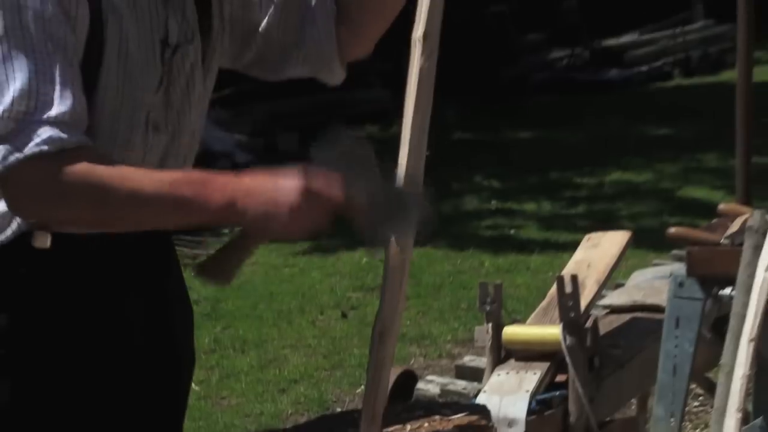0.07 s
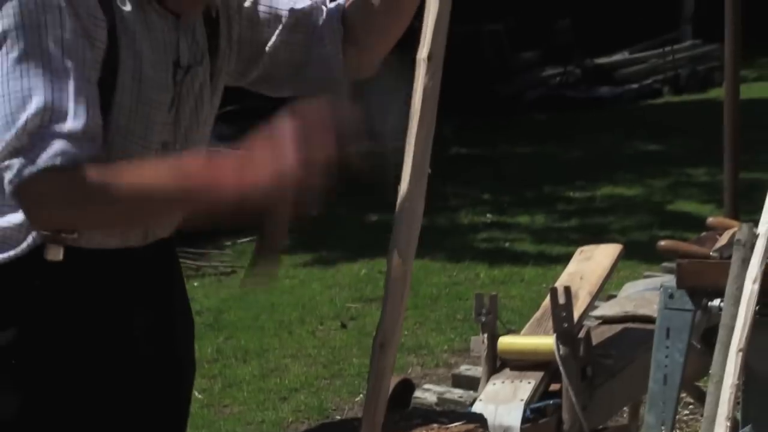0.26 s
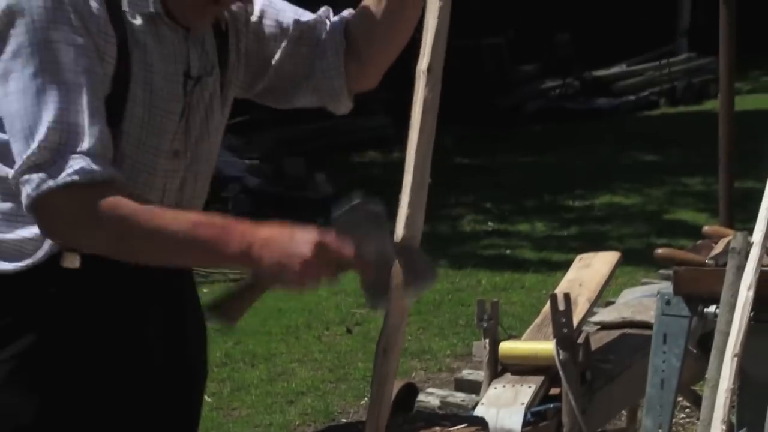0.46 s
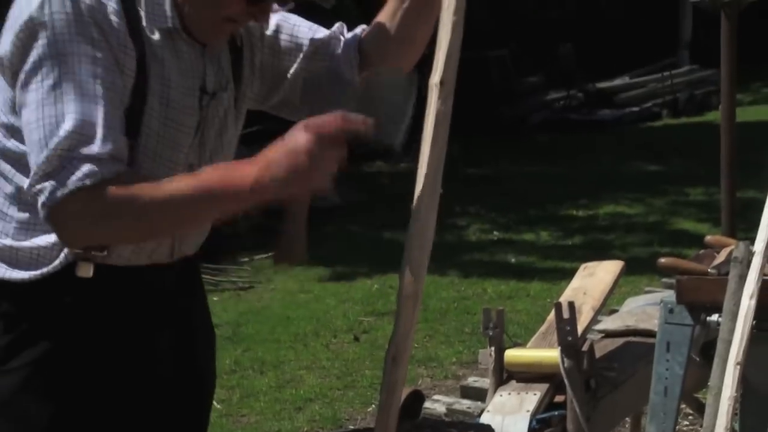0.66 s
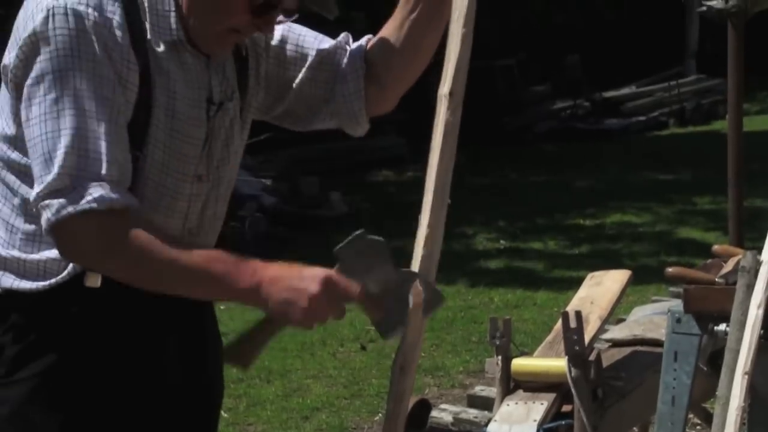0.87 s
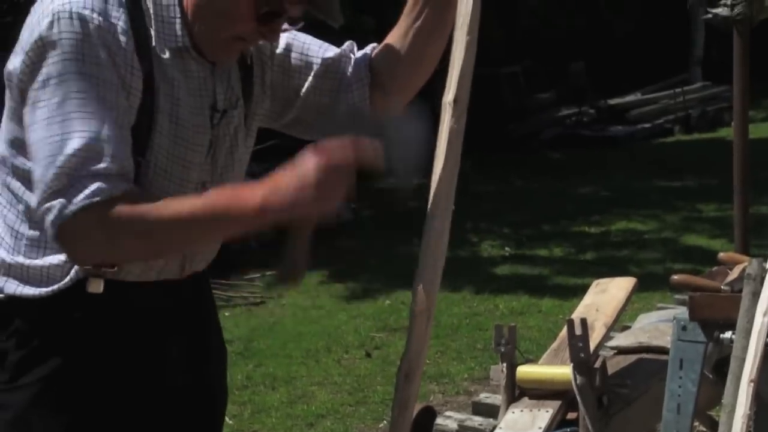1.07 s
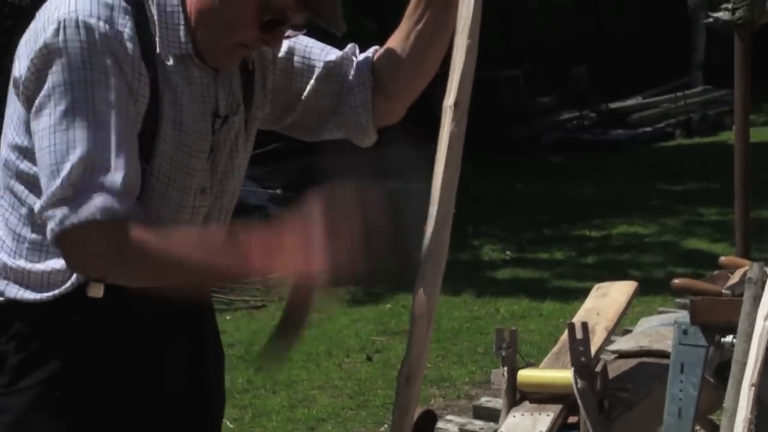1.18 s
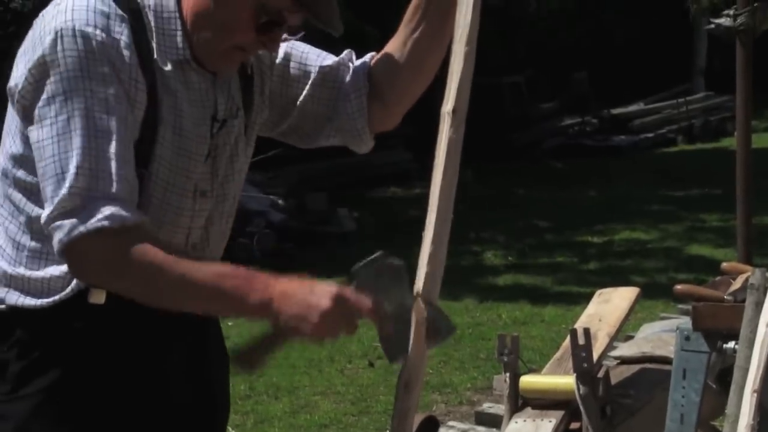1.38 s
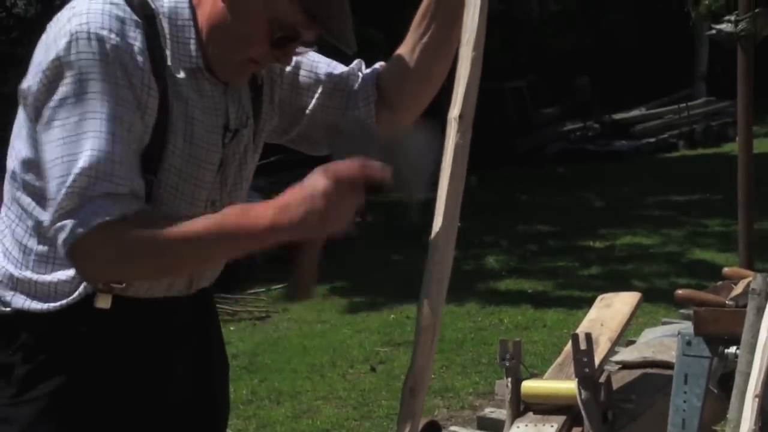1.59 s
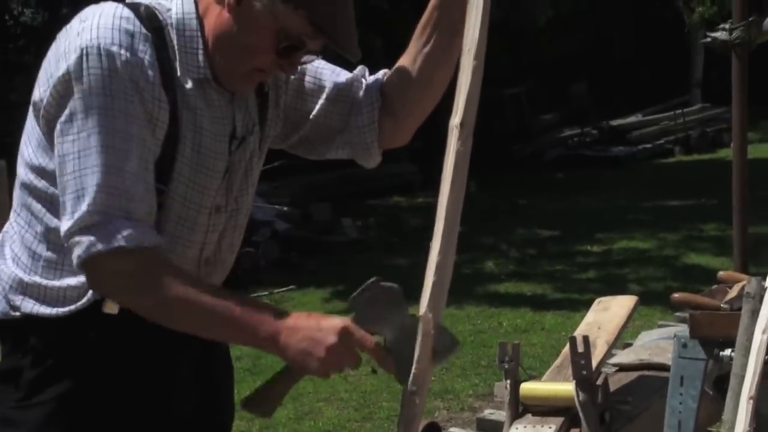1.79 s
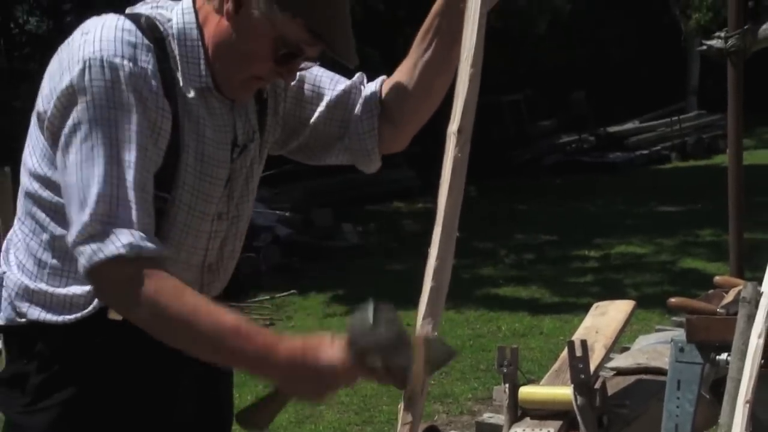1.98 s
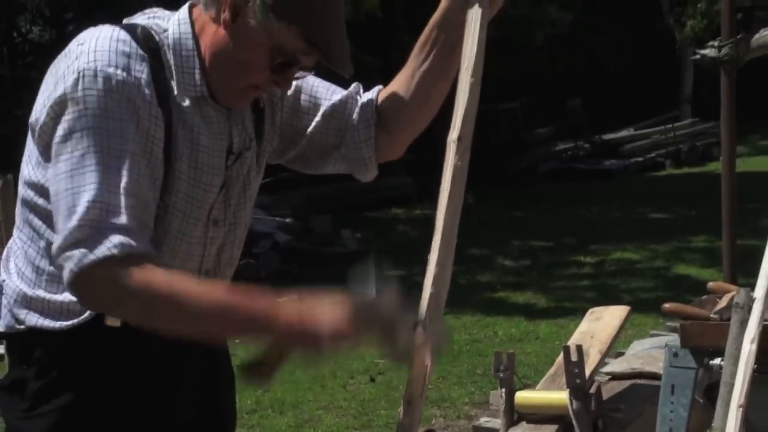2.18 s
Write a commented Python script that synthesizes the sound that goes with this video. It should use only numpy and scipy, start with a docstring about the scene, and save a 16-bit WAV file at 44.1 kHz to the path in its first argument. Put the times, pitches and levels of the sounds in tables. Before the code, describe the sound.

Close, dry axe chops in wood, four in under two seconds, the later ones with a harder knock and clack, then small splintering cracks. Open garden with a faint short tail, wind buffeting the microphone, soft hiss.

```python
"""Gusts rumble on the microphone and a faint hiss lies over a garden throughout: shaped noise.
An axe then takes four quick strokes at a wooden blank standing on a chopping block.
Each is a swelling crunch of parting fibres, made of random snaps, that ends as the blade stops in
a knock and a clack of damped modes; the surroundings return a faint tail, a decaying noise response.
Small cracks and rubs fall between the strokes; after the last one a chip splinters away."""
import sys
import numpy as np
from scipy import signal
from scipy.fft import rfft, irfft
from scipy.io import wavfile
from scipy.ndimage import uniform_filter1d

SR = 44100
rng = np.random.default_rng(int(sys.argv[2]) if len(sys.argv) > 2 else 0)


def log_audio(samples):
    """Write samples as a 16-bit WAV file to the path given in sys.argv[1]."""
    # one column per channel
    frames = np.atleast_2d(samples).T
    # limit to full scale, then quantise
    limited = np.clip(frames, -1, 1)
    pcm = np.round(limited * 32767).astype(np.int16)
    wavfile.write(sys.argv[1], SR, pcm)


N = 99225
T = np.arange(N) / SR   # s
STROKE_T = np.arange(-1024, 5120) / SR   # time around the stop of one stroke, s
SNAPS_PER_S = 9900   # mean rate of fibre fractures


def from_db(db):
    """Invert the decibel law: level in dB to amplitude gain."""
    return 10 ** (np.asarray(db) / 20)


def rms_one(x):
    """Normalise by mean power, so that a gain applied later sets the rms level."""
    return x / np.sqrt(np.mean(x ** 2) + 1e-20)


def coloured(x, points):
    """Spectral shaping: weight each frequency by a curve interpolated on a log axis; rms 1."""
    hz, db = np.transpose(points)
    f = np.maximum(np.fft.rfftfreq(len(x), 1 / SR), 1)
    gain = from_db(np.interp(np.log(f), np.log(hz), db))
    return rms_one(irfft(rfft(x) * gain, len(x)))


def noise(points):
    """Stationary Gaussian noise with a given spectral shape; rms 1."""
    return coloured(rng.standard_normal(N), points)


def snaps(per_s):
    """Fracture as a random impulse train: tiny breaks of uneven size and either sign; rms 1."""
    spread_db = 3.5
    sizes_db = spread_db * np.minimum(rng.exponential(1, N), 4)
    sizes = from_db(sizes_db) * rng.choice([-1, 1], N)
    return rms_one(sizes * (rng.random(N) < per_s / SR))


def bell(x, hz, db, q):
    """Second-order resonance: a peak or dip in response around one frequency."""
    w = 2 * np.pi * min(hz / SR, .45)
    a = from_db(db / 2)
    k = np.sin(w) / (2 * q)
    zeros = [1 + k * a, -2 * np.cos(w), 1 - k * a]
    poles = [1 + k / a, -2 * np.cos(w), 1 - k / a]
    return signal.lfilter(zeros, poles, x)


def swells(rows):
    """Gaussian envelopes: smooth rises that fall to 1/e at the half length on either side."""
    return sum(from_db(db) * np.exp(-((T - s) / half_s) ** 2) for s, db, half_s in rows)


def cracks(rows):
    """Sudden release: each envelope starts at once and decays exponentially."""
    return sum(from_db(db) * (T >= s) * np.exp(-np.abs(T - s) / fade_s) for s, db, fade_s in rows)


def axe():
    """Superposition: each stroke adds a crunch, the modes struck by the stop, and their tail."""
    # strokes: stop of the blade t/s, cutting time/s, fade/s, six crunch levels/dB by register,
    # knock level/dB, clack level/dB, tail level/dB
    strokes = [(0.3371, 0.0049, 0.0045, -29.5, -27, -25, -29.5, -26, -27, -30.5, -26, -23),
               (0.7754, 0.0049, 0.0082, -34.5, -37, -34, -36.5, -37, -42.5, -36, -47, -22),
               (1.2383, 0.0039, 0.0057, -35.5, -31.5, -29.5, -26.5, -25.5, -32, -14.5, -25.5, -20),
               (1.7361, 0.0044, 0.0075, -31, -28.5, -31.5, -27, -24.5, -31.5, -23.5, -11.5, -18.5)]
    # dull modes of blank and block: f/Hz, level/dB, t60/s
    knock_modes = [(352, -15, 0.042), (590, -20, .022), (691, 0, 0.053), (1040, -35, .045),
                   (1207, -29, 0.055), (1520, -9, 0.023), (2010, -8.5, 0.027)]
    # bright modes where the blade jams in the wood: f/Hz, level/dB, t60/s
    clack_modes = [(2950, -12.5, .035), (3300, -12.5, 0.019), (3850, -2, 0.019), (4227, -0.5, 0.026),
                   (4955, -9, 0.032), (5340, -9, 0.031)]
    ring_in_tail_db = -9   # the ringing modes spread less than the crunch
    out = np.zeros(N)
    for stop_s, cut_s, fade_s, *register_dbs, knock_db, clack_db, tail_db in strokes:
        cut = crunch(stop_s, cut_s, fade_s, register_dbs)
        stop = from_db(knock_db) * ring(knock_modes) + from_db(clack_db) * ring(clack_modes)
        sound = from_db(tail_db) * garden(cut + from_db(ring_in_tail_db) * stop)
        sound[:len(cut)] += cut + stop
        start = int((stop_s + STROKE_T[0]) * SR)
        out[start:start + len(sound)] += sound[:N - start]
    return out


def crunch(stop_s, cut_s, fade_s, register_dbs):
    """Force-modulated fracture: snaps grow as the blade drives in, then settle; wood colours them."""
    # registers of the crunch: lower edge f/Hz, upper edge f/Hz
    registers = [(290, 450), (500, 850), (900, 1480), (1700, 2400), (2650, 6400), (6500, 17000)]
    # larger bundles of fibres that break within a stroke: t/s, strength/dB relative to full force
    bundles = [(0.3346, 2.5), (0.3385, -5), (0.7693, 3.5), (0.7733, -3), (0.777, -3), (1.2252, -18),
               (1.233, 0.5), (1.2369, 1), (1.2386, 5.5), (1.7326, 2), (1.737, 5), (1.7421, -5)]
    # colour that the wood gives the crunch: f/Hz, gain/dB, Q
    grain = [(464, -8, 9.5), (820, -13.5, 3.7), (1180, 4.5, 5.4), (1860, 1, 9.1), (2350, -3, 4.4),
             (4200, -1.5, 4.6), (4980, 4.5, 2.4), (6840, -2.5, 2.7), (14100, -10.5, 0.99)]
    settle_db, settle_s = -22, 0.02   # fibres keep giving after the stop
    bundle_fade_s = .001
    level_span_s = .01   # register levels are energy spread over this time
    before, after = np.maximum(-STROKE_T, 0), np.maximum(STROKE_T, 0)
    rise = np.exp(-(before / cut_s) ** 1.25)
    fall = np.exp(-after / fade_s) + from_db(settle_db) * np.exp(-after / settle_s)
    force = rise * fall
    now = stop_s + STROKE_T
    for at, db in bundles:
        force = force + from_db(db) * (now >= at) * np.exp(-np.abs(now - at) / bundle_fade_s)
    fibres = force * snaps(SNAPS_PER_S)[:len(STROKE_T)] + 1e-18
    for hz, db, q in grain:
        fibres = bell(fibres, hz, db, q)
    out = 0
    for edges, db in zip(registers, register_dbs):
        band = signal.sosfilt(signal.butter(3, edges, "band", fs=SR, output="sos"), fibres)
        out = out + from_db(db) * band / np.sqrt(np.sum(band ** 2) / (level_span_s * SR))
    return out


def ring(modes):
    """Modal synthesis: exponentially damped sines, alternating in sign, struck as the blade stops."""
    t = np.maximum(STROKE_T, 0)   # each sine is zero until the stop
    out = 0
    for k, (hz, db, t60) in enumerate(modes):
        out = out + (-1) ** k * from_db(db - 60 * t / t60) * np.sin(2 * np.pi * hz * t)
    return out


def splinters():
    """Fracture and friction: chips crack off, and the blade rubs as it is worked out of the cut."""
    # splinters and chips: t/s, level/dB, fade/s
    chips = [(0.309, -57, 0.0029), (0.49, -58.5, 0.0089), (0.8284, -50.5, .003), (0.9444, -65, .008),
             (1.4285, -47, .005), (1.6895, -55.5, 0.0027), (1.8868, -53, 0.0017), (1.9281, -40, 0.0019),
             (1.9335, -38.5, 0.0034), (1.9513, -32.5, 0.0025), (1.9544, -24.5, 0.0012),
             (1.9585, -34.5, 0.0026), (1.9676, -47, 0.0039), (1.9805, -45, .002), (2.0214, -57, .004),
             (2.2274, -53.5, 0.0032)]
    # rubs of the blade: t/s, level/dB, half length/s
    rubs = [(0.05, -75, .015), (0.485, -64, 0.018), (0.935, -67, .02), (1.445, -61, 0.03),
            (1.925, -64, .012), (1.965, -50, 0.024), (2.02, -60, 0.04), (2.18, -64, .05)]
    # spectral shape of the chips: f/Hz, relative level per Hz/dB
    chip_colour = [(200, -33), (700, -20), (2000, -21), (3300, -7), (4800, 3.5), (6500, -4), (10000, -10.5),
                   (16000, -8.5)]
    # spectral shape of the rubs: f/Hz, relative level per Hz/dB
    rub_colour = [(1000, -6.5), (4500, -2), (8000, 1.5), (16000, -3.5)]
    rub_snaps_per_s = 2300
    cracking = cracks(chips) * coloured(snaps(SNAPS_PER_S), chip_colour)
    rubbing = swells(rubs) * coloured(snaps(rub_snaps_per_s), rub_colour)
    return cracking + rubbing


def garden(x):
    """Diffuse reverberation: convolution with decaying noise of unit energy, with one scattered echo."""
    # spectral shape of the tail: f/Hz, relative level/dB
    tail_colour = [(150, -20), (600, -4), (1500, -4), (3000, 4), (5000, 2.5), (7500, -2.5), (16000, -8)]
    t60_s, onset_s = 0.32, 0.0057
    echo_s, echo_width_s, echo_gain = 0.058, 0.0048, 0.43   # return from trees and stacked timber
    t = T[:SR // 2]
    decay = from_db(-60 * t / t60_s) * (1 - np.exp(-t / onset_s))
    echo = 1 + echo_gain * np.exp(-((t - echo_s) / echo_width_s) ** 2)
    response = coloured(rng.standard_normal(len(t)), tail_colour) * decay * echo
    return signal.fftconvolve(x, response / np.linalg.norm(response))


def wind():
    """Turbulent pressure on the microphone: gusts modulate deep rumble, flutter and short buffets."""
    # gusts, before the trims below: t/s, deep rumble level/dB, level of the flutter above it/dB
    gusts = [(0.0, -41, -51.5), (0.14, -70, -55.5), (0.22, -50, -38), (0.43, -57, -38.5),
             (0.45, -43, -42.5), (0.56, -44.5, -34.5), (0.7, -40.5, -46.5), (0.82, -32, -34.5),
             (0.86, -38.5, -48), (0.89, -49, -33.5), (1.15, -66, -45.5), (1.22, -39, -38), (1.44, -26, -40),
             (1.45, -36, -37.5), (1.87, -54, -51.5), (1.9, -45, -45), (2.03, -54, -45.5), (2.25, -56, -46)]
    # short buffets: t/s, level/dB, half length/s
    buffets = [(0.376, -29.5, 0.012), (0.417, -29, 0.011), (0.521, -34.5, 0.0056), (0.565, -42, 0.0028),
               (0.582, -33.5, 0.0062), (0.63, -40, 0.0083), (0.79, -33.5, 0.0091), (0.868, -39.5, 0.009),
               (0.987, -36, 0.0073), (1.025, -40, 0.013), (1.265, -31.5, 0.0062), (1.36, -46, 0.01),
               (1.43, -35, 0.0076), (1.465, -39, 0.0056), (1.523, -40, .015), (1.925, -38.5, 0.022),
               (2.141, -34.5, 0.0032)]
    # spectral shapes of the three: f/Hz, relative level per Hz/dB
    rumble_colour = [(15, -22), (25, -9), (38, 1.5), (55, -2.5), (85, -7.5), (200, -57), (2000, -110)]
    flutter_colour = [(40, -26.5), (65, -1.5), (90, 2), (125, -3), (200, -10.5), (300, -17.5), (450, -25),
                      (700, -36.5), (1500, -49), (8000, -105)]
    buffet_colour = [(50, -11.5), (110, 4), (220, 1), (330, -9), (600, -18), (1200, -34.5), (2500, -47),
                     (8000, -90)]
    rumble_trim_db, flutter_trim_db = 1, 1.5
    s, rumble_db, flutter_db = np.transpose(gusts)
    rumble_gain = from_db(rumble_trim_db + np.interp(T, s, rumble_db))
    flutter_gain = from_db(flutter_trim_db + np.interp(T, s, flutter_db))
    rumble = rumble_gain * eddies(rumble_colour, size=2200)
    flutter = flutter_gain * eddies(flutter_colour, size=1500)
    return rumble + flutter + swells(buffets) * eddies(buffet_colour, size=600)


def eddies(points, size):
    """Envelope levelling: low noise evened out over size samples, so that the gusts set its level."""
    x = noise(points)
    power = np.abs(signal.hilbert(x)) ** 2 / 2
    return x / np.sqrt(uniform_filter1d(power, size=size) + 0.057)   # the floor limits the gain


def far_hiss():
    """Stationary broadband noise: the steady hiss of the far garden."""
    # spectral shape: f/Hz, relative level per Hz/dB
    hiss_colour = [(350, -9), (600, -7.5), (881, -15.5), (919, -14), (1080, -15), (3990, -18.5),
                   (4340, -18), (7410, -24), (8050, -25.5), (16000, -36)]
    return from_db(-61) * noise(hiss_colour)


def scene():
    """Linear superposition of axe work, chips and their tail, wind and far hiss; one channel."""
    chips = splinters()
    chip_tail = from_db(-20.5) * garden(chips)[:N]
    return (axe() + chips + chip_tail + wind() + far_hiss())[None]


def record(dry):
    """Band limitation: a steep elliptic low-pass cuts the top."""
    cutoff_hz = 15850
    low_pass = signal.ellip(10, .1, 80, cutoff_hz, fs=SR, output="sos")   # ripple, stop band in dB
    return signal.sosfilt(low_pass, dry)


dry = scene()
out = record(dry)
log_audio(out)
```